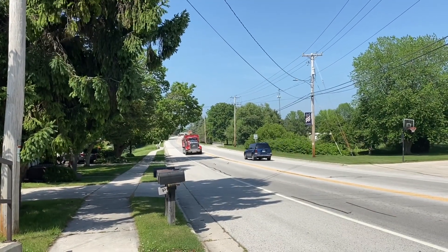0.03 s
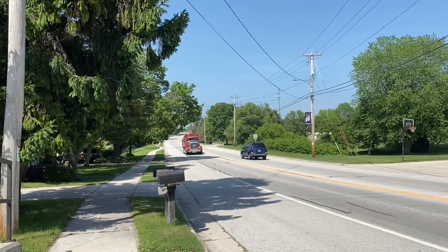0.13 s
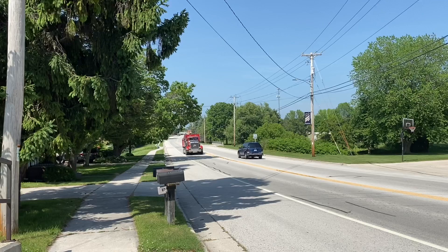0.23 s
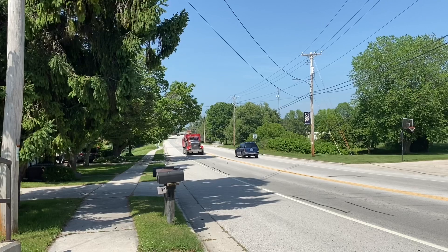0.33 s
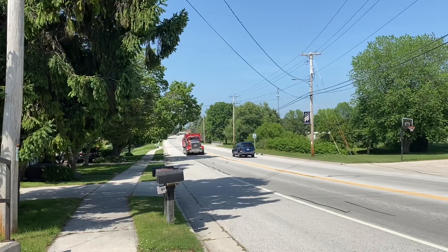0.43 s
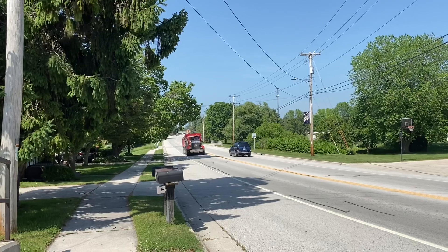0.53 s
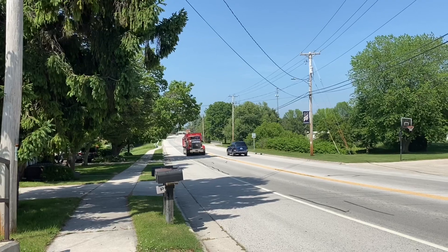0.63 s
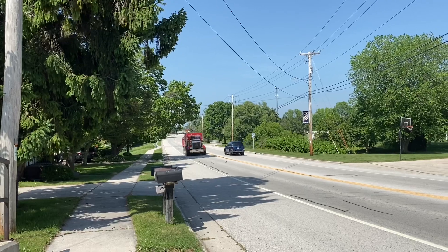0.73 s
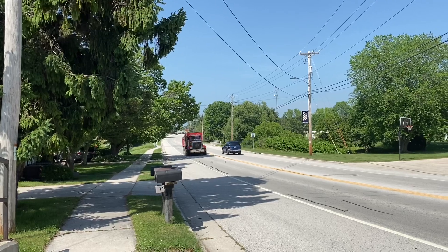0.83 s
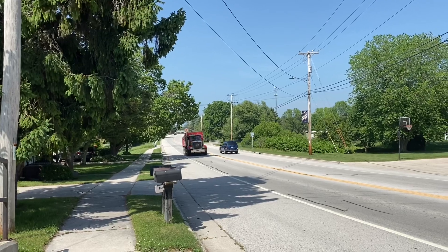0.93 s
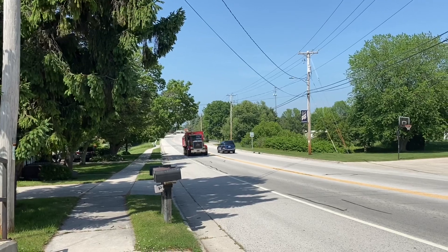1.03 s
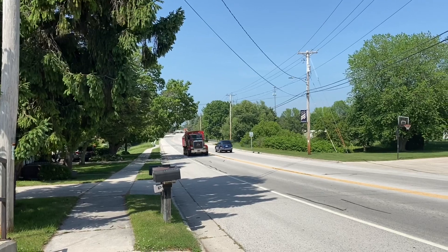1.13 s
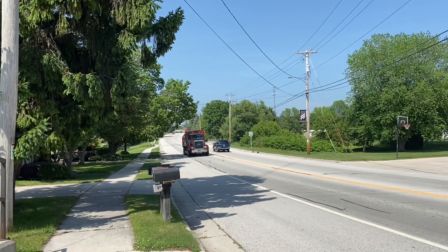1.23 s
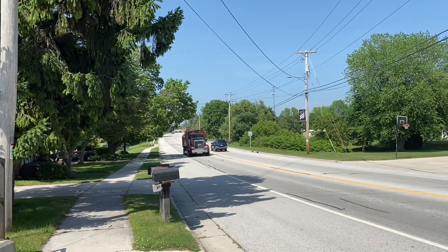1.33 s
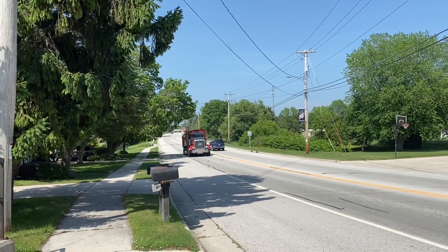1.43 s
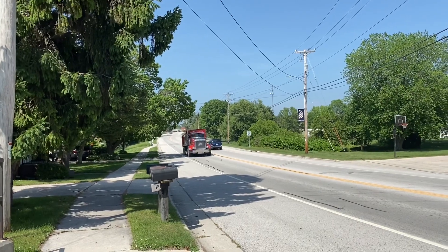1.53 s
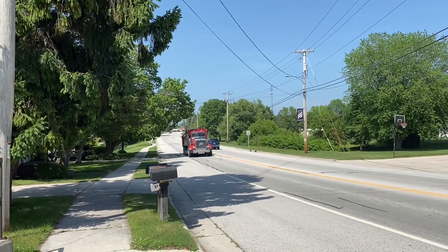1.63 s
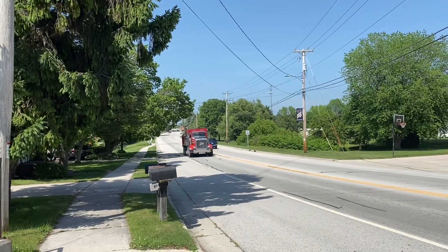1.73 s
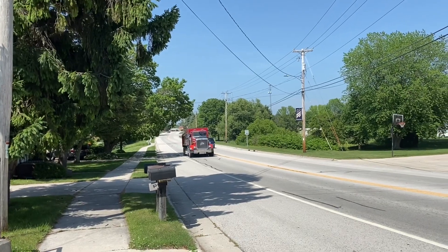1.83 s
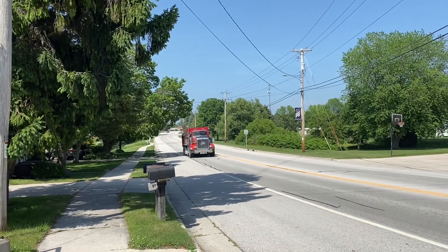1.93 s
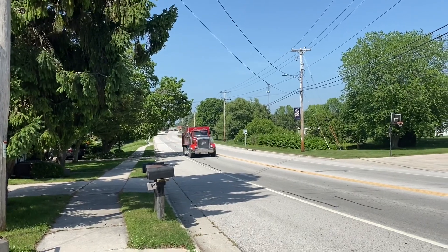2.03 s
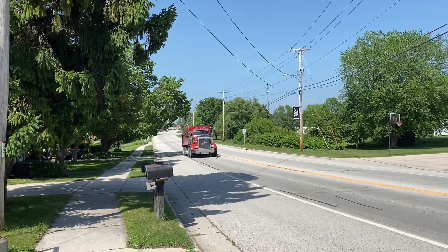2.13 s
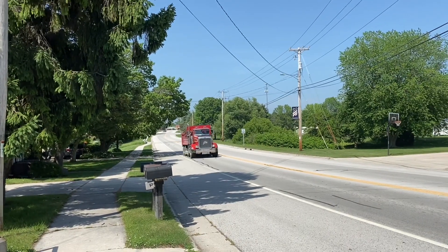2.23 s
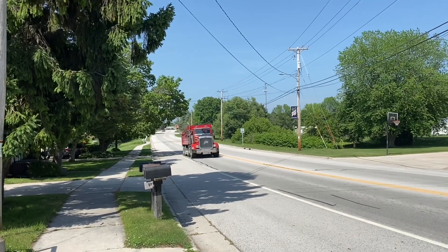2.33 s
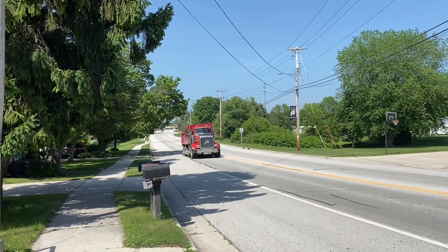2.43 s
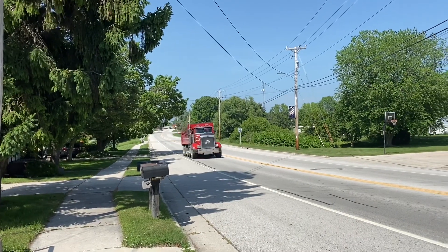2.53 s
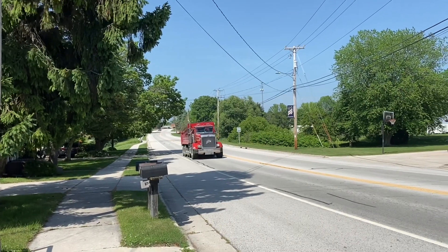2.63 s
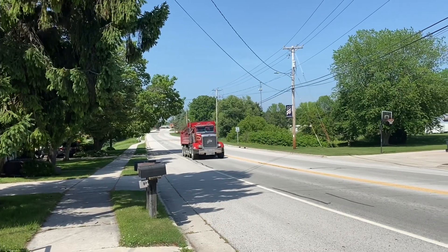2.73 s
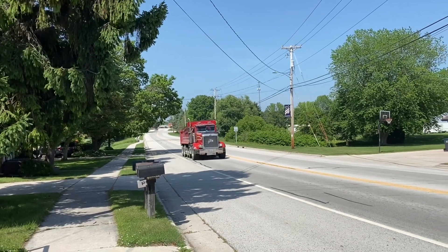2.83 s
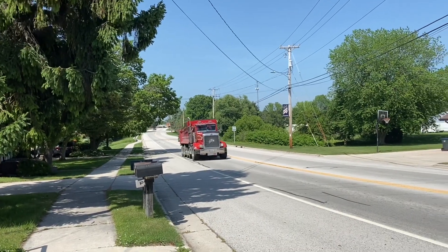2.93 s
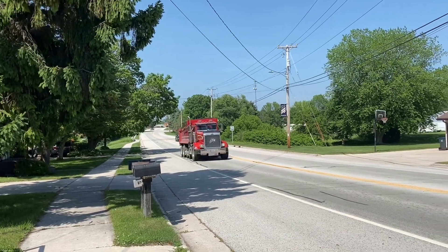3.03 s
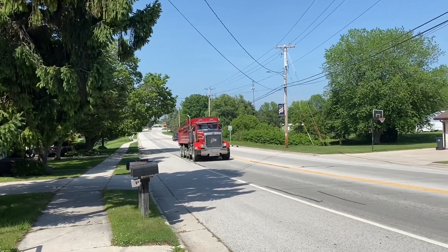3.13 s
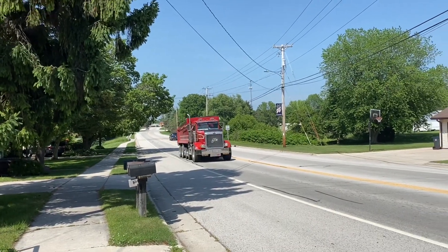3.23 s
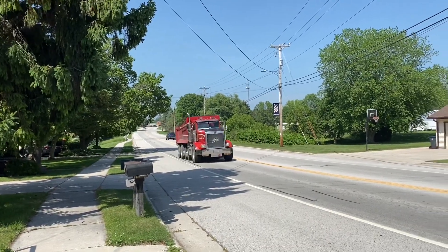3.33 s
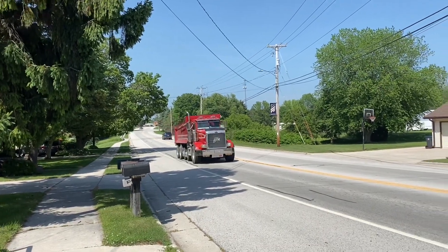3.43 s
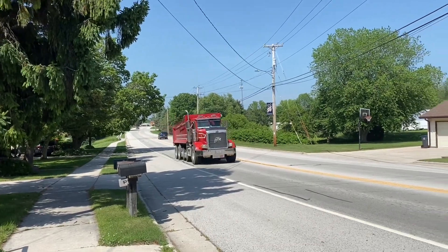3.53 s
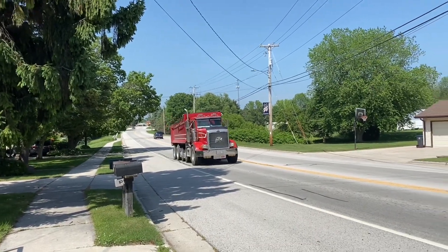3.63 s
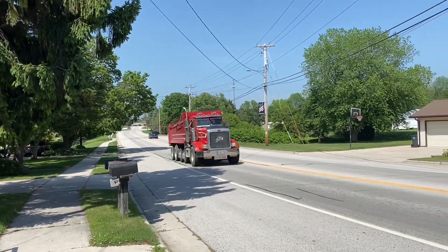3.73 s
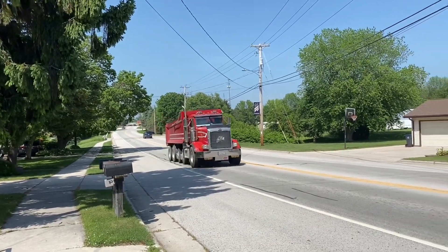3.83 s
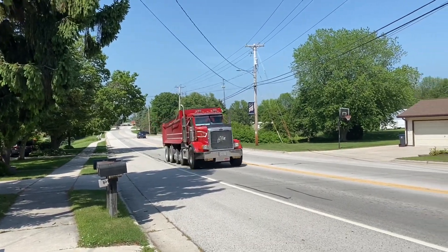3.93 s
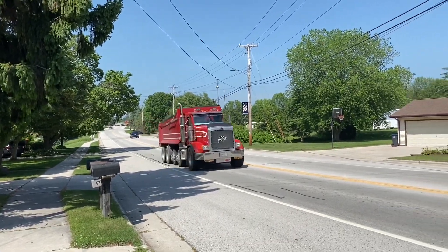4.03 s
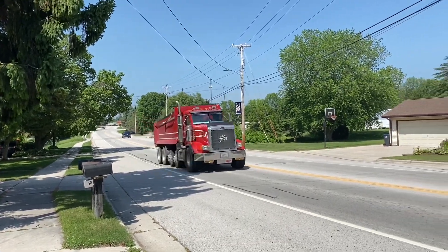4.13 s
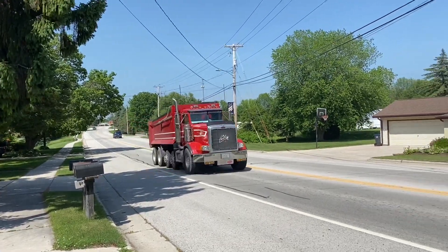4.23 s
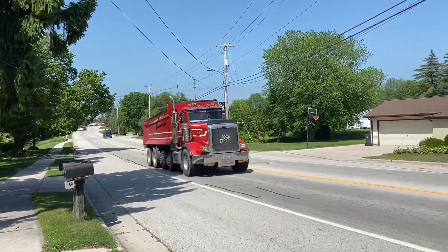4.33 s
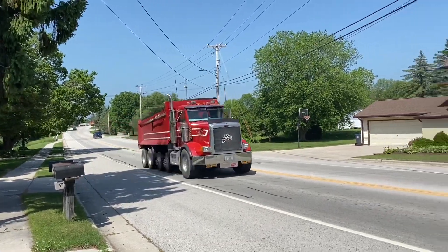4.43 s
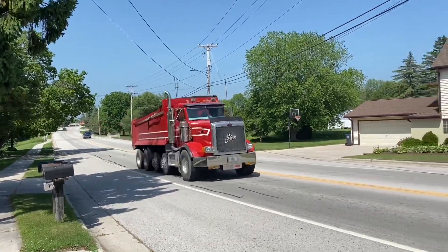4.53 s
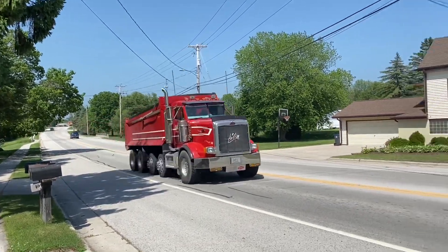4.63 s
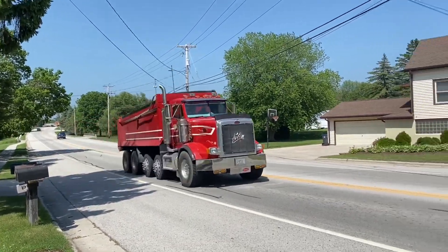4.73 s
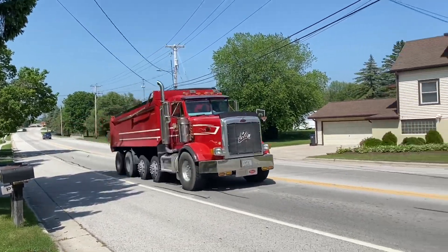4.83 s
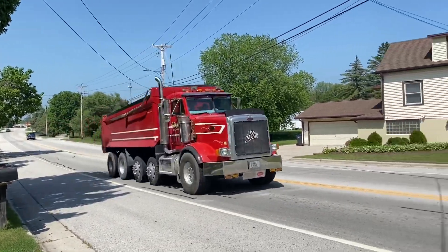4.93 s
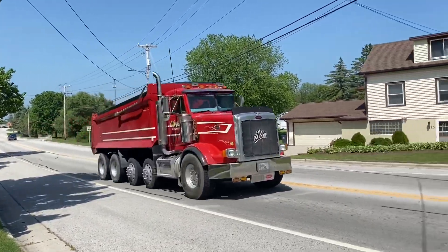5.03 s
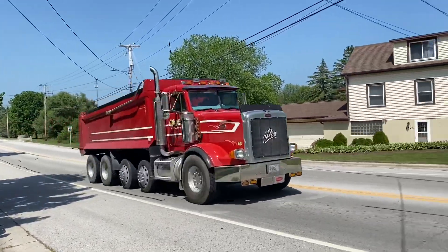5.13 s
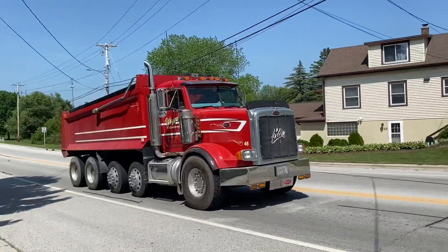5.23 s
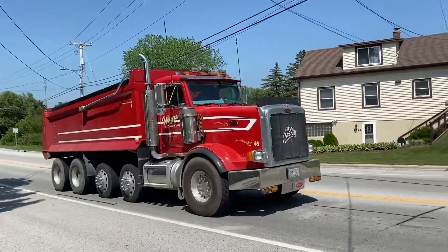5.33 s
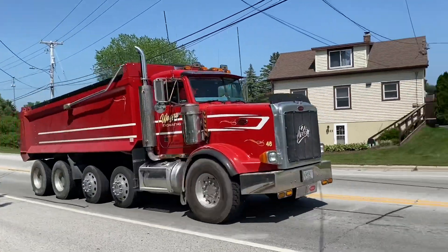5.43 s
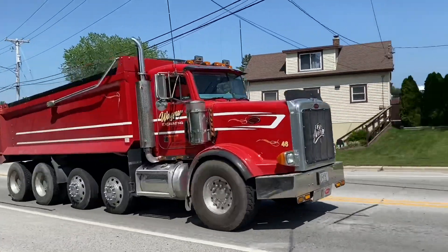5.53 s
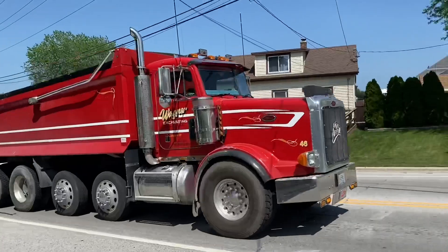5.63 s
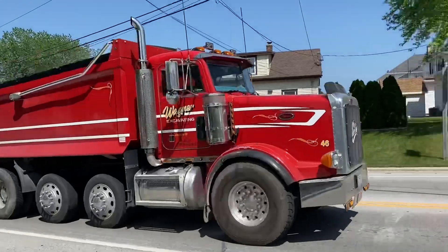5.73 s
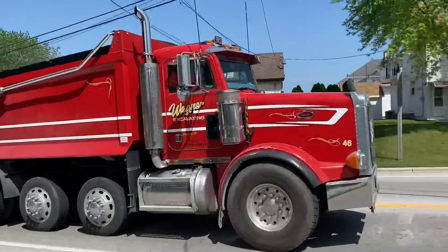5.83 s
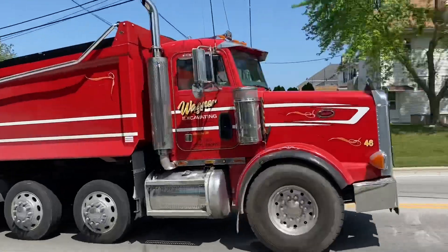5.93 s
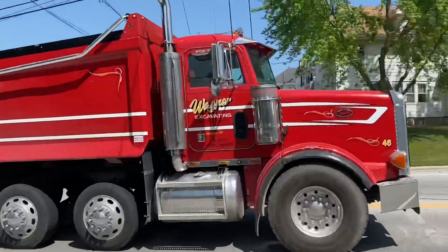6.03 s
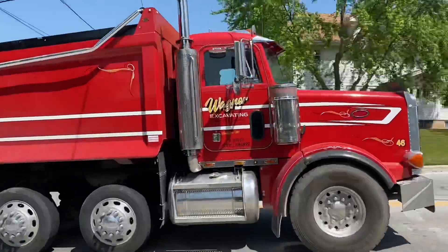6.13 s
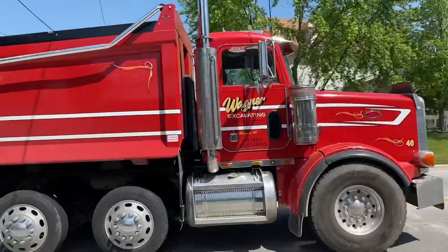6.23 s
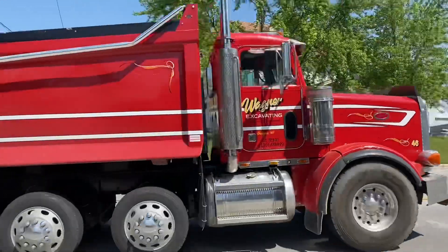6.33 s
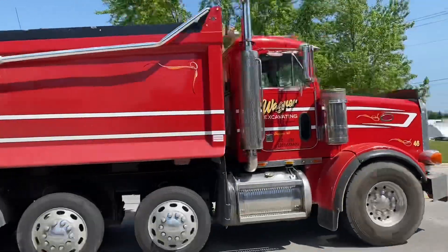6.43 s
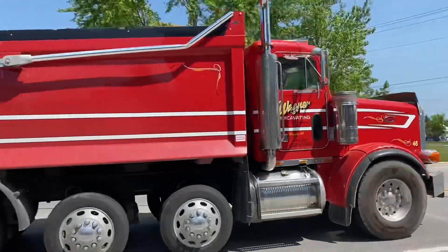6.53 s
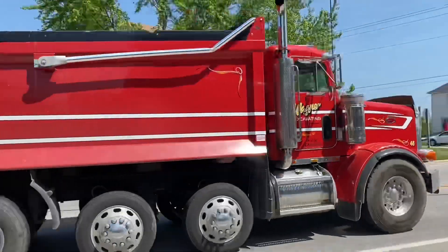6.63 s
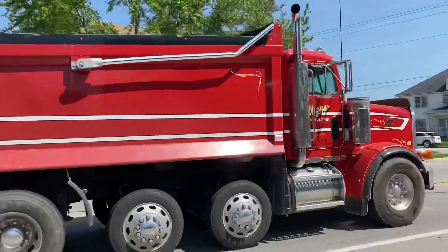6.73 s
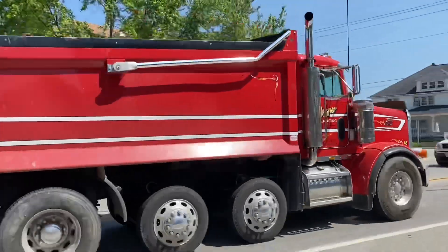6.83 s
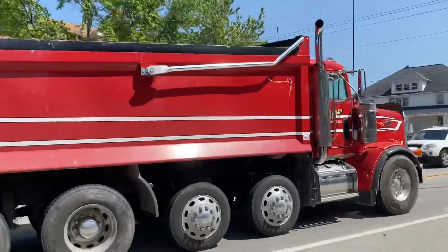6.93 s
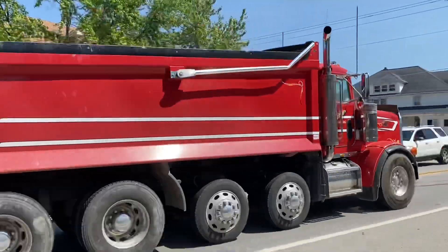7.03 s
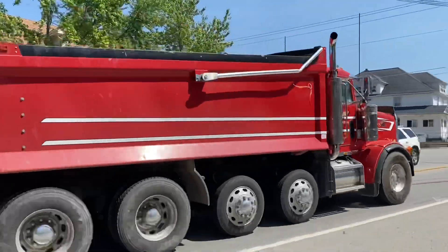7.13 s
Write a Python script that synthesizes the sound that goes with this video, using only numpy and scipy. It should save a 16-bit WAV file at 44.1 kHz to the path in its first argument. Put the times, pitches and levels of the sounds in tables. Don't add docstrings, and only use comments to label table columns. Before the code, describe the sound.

On a tree-lined street, a heavy diesel truck comes closer with its engine brake on, a fast rattling machine-gun boom with cracks and hiss. A bird sings faintly at first while a car drives off. The beat slows and grows very loud, then releases alongside with a chirp, leaving falling turbo whistle, tyre roar, brake squeaks and lumpy low rumble. Stereo roadside microphone, sparse echoes from houses.

```python
import sys
import numpy as np
from scipy import signal
from scipy.fft import rfft, irfft, next_fast_len
from scipy.io import wavfile
from scipy.ndimage import uniform_filter1d, minimum_filter1d

SR = 44100
rng = np.random.default_rng(int(sys.argv[2]) if len(sys.argv) > 2 else 0)


def generate_wav(signal):
    frames = np.transpose(np.atleast_2d(signal))
    scaled = np.clip(frames, -1, 1) * 32767
    pcm = np.round(scaled).astype(np.int16)
    wavfile.write(sys.argv[1], SR, pcm)


def gain_from_decibels(decibels):
    exponent = np.asarray(decibels, float) / 20
    return 10 ** exponent


N = 316638

STEP = 128
TOP_HZ = 12600
RELEASE_S = 6.13
MOUTH_M, STACK_M, WHEELS_M = (0, 3.86), (3.25, 5.65), (-6, 11.9)
STACK_ECHO_MS_M = 30.6

# time in seconds, cylinder ventings a second as heard.
FIRING = [(0.0, 62.05), (0.384, 61.77), (0.769, 61.11), (1.153, 60.69), (1.538, 59.96), (1.922, 59.1),
          (2.306, 58.21), (2.691, 57.36), (3.075, 56.17), (3.459, 55.13), (3.844, 53.44), (4.228, 51.97),
          (4.613, 49.65), (4.997, 47.15), (5.381, 44.47), (5.766, 41.69), (6.15, 38.53)]
# boom level in dB, boom shift in ventings, crack level in dB, knock level in dB.
CYLINDERS = [(1.5, .02, -10, -3), (-2.5, .005, -2.5, -3), (.5, -.024, -3.5, -6), (1.5, .017, -10, -7),
             (-2, .0, 0, 0), (1, -.02, -6, -6)]
# time and length in seconds, pitch in Hz,
# gain in dB.
APPROACH_SWELLS = [(0.24, 0.28, 62, -9), (1.58, 0.61, 298, 6.5), (0.68, 0.66, 10000, -2.5), (1.45, .3, 3600, 5),
                   (1.9, 0.61, 6000, 3.5), (2.43, 0.71, 500, 9), (2.35, 0.34, 1000, 2), (2.77, 0.93, 230, 3.5),
                   (3.16, 0.47, 500, -15), (3.39, 0.51, 1000, 6.5), (3.55, .2, 55, -5), (3.664, 0.29, 272, 6.5),
                   (3.9, 0.47, 160, -5.5), (3.85, 0.11, 214, -9), (4.22, 0.11, 52, -5.5), (4.45, 0.042, 152, -8),
                   (4.7, 0.08, 144, 5), (4.65, .2, 200, 4), (4.84, 0.24, 327, 12), (5.73, 0.22, 168, -6.5),
                   (5, 0.28, 1000, 0), (5.25, 0.36, 138, 10), (5.35, 0.21, 268, 3.5), (6.03, 0.089, 1000, 2),
                   (6, 0.23, 234, -31), (5.55, 0.11, 500, 1.5), (6, 0.13, 500, -4.5), (6, 0.081, 119, -6)]
# time and length in
# seconds, pitch in Hz, gain in dB.
RELEASE_SWELLS = [(6.34, .07, 6460, 9), (6.355, 0.037, 700, 4.5), (6.453, .1, 69, -5), (6.543, .04, 148, 21),
                  (6.623, 0.045, 69, -10), (6.632, 0.059, 100, 3.5), (6.595, 0.092, 5460, -0.5),
                  (6.747, 0.17, 3270, 3.5), (6.8, 0.055, 5170, 2.5), (6.822, 0.059, 100, -3.5),
                  (6.9, 0.057, 138, 13), (6.906, 0.087, 69, 1.5), (7.05, .15, 4600, 2.5), (7.135, 0.091, 131, 22.5),
                  (7.18, 0.076, 100, 3.5)]


def curve(rows):
    s, *columns = np.transpose(rows)
    return [np.interp(np.arange(N) / SR, s, c) for c in columns]


def read(points, hz):
    f, value = np.transpose(points)
    return np.interp(np.log(hz + 30), np.log(f + 30), value)


def slow(x):
    return np.interp(np.arange(N), np.arange(0, N, STEP), x)


def evened(x):
    return x / np.sqrt(np.mean(x ** 2) + 1e-20)


def drift(size):
    once = uniform_filter1d(rng.standard_normal(N), size)
    return evened(uniform_filter1d(once, size))


def resonate(x, hz, width):
    turn = np.exp(2j * np.pi * np.cumsum(hz * np.ones(len(x))) / SR)
    r = np.exp(-np.pi * width / SR)
    smooth = signal.lfilter([(1 - r) ** 2], [1, -2 * r, r * r], x / turn + 1e-18)
    return 2 * (turn * smooth).real


def ring(x, modes):
    t = np.arange(2048) / SR
    shape = np.zeros(len(t))
    for k, (hz, width, db) in enumerate(modes):
        decay = t * width ** 1.5 * np.exp(-np.pi * width * t)
        shape += (-1) ** k * gain_from_decibels(db) * decay * np.sin(2 * np.pi * hz * t)
    return evened(signal.oaconvolve(x, shape)[:N])


def noise(spectrum, patchy_db, size):
    # frequency in Hz, likeness of the noise at the two ports from 0 to 1.
    likeness = [(50, 0.22), (250, 1), (700, 0.82), (2000, 0.4), (5000, 0.46), (9000, 0.47), (13000, 1)]
    frames, hz = 4 * N // size + 5, np.fft.rfftfreq(size, 1 / SR)
    used = hz[hz < min(TOP_HZ, spectrum[-1][0])]
    a, b, c, d, patches = rng.standard_normal((frames, len(used), 5), dtype=np.float32).T
    patches = uniform_filter1d(patches, size=8, axis=0)
    patches = evened(uniform_filter1d(patches, size=8, axis=1))
    unlike = np.sqrt(1 / np.clip(read(likeness, used), .1, 1) - 1)[:, None] * (c + 1j * d) / 2
    colour = gain_from_decibels(read(spectrum, used)[:, None] + patchy_db * patches)
    z = np.zeros((2, len(hz), frames), np.complex64)
    z[:, :len(used)] = np.array([a + 1j * b + unlike, a + 1j * b - unlike]) * colour
    return evened(signal.istft(z, nperseg=size, noverlap=3 * size // 4)[1][:, :N])


def turns():
    return .28 + np.cumsum(curve(FIRING)[0]) / SR


def braking(fade):
    last_turn = 332.4
    return np.clip((last_turn - turns()) / fade + 1, 0, 1)


def since():
    return np.maximum(np.arange(N) / SR - RELEASE_S, 0)


def metres(place):
    m_per_venting, abreast_turn = .2, 321
    return np.hypot(m_per_venting * (abreast_turn - turns()) + place[0], place[1])


def swells(rows, hz):
    t = np.arange(0, N, STEP) / SR
    db = 0
    for s, length, f, gain_db in rows:
        db = db + gain_db * np.exp(-((t - s) / length) ** 2 - (np.log(hz / f) / 0.098) ** 2)
    return db


def level(place, hz, near_db, slope, step_db=0, db_per_s=0):
    far_db = -20 * np.log10(metres(place) / place[1])
    after_db = step_db * (1 - braking(1.3)) + db_per_s * since()
    return near_db + slope * far_db + after_db + slow(swells(APPROACH_SWELLS + RELEASE_SWELLS, hz))


def bounced(x, share):
    late = np.arange(N) - STACK_ECHO_MS_M / metres(STACK_M) * SR / 1000
    return x + share * np.array([np.interp(late, np.arange(N), v) for v in np.atleast_2d(x)])


def street(x):
    taps, t = np.zeros((2, SR // 4)), np.arange(SR // 4) / SR
    at = np.arange(200, SR // 4 - 20, 20) + rng.integers(0, 20, (2, (SR // 4 - 201) // 20))
    np.put_along_axis(taps, at, rng.choice([-1., 1.], at.shape), 1)
    taps *= gain_from_decibels(-60 * t / 0.83)
    return signal.oaconvolve(x[None], taps / np.linalg.norm(taps[0]), axes=1)[:, :N]


def whistle(s, hz, db):
    t = np.arange(s[0], s[-1], 1 / SR)
    sine = np.sin(2 * np.pi * np.cumsum(np.interp(t, s, hz)) / SR)
    tone = np.sqrt(2) * gain_from_decibels(np.interp(t, s, db)) * sine * signal.windows.tukey(len(t), .6)
    return np.pad(tone, (round(s[0] * SR), N))[:N]


def bird():
    # start in seconds, length in seconds, level in dB.
    notes_sung = [
        (0, .25, -59),
        (.28, .38, -62),
        (.78, .26, -53.5),
        (1.08, .17, -64.5),
    ]
    out = np.zeros(N)
    for s, length, db in notes_sung:
        span = np.array([s, s + length])
        out += whistle(span, 5890 - 200 * span, (db, db))
    return out


def driving_away(db):
    return gain_from_decibels(db) * gain_from_decibels(-3.5 * np.arange(N) / SR)


def ground_rumble():
    # frequency in Hz, spectral level in dB per Hz.
    spectrum = [(21, -47), (35, -24), (54, -5), (135, -4), (152, -4), (168, -5), (210, -15), (387, -17.5),
                (500, -18.5), (650, -30.5), (1100, -120)]
    truck = gain_from_decibels(level(WHEELS_M, 100, near_db=-21, slope=0.54, step_db=-3.5, db_per_s=2))
    return np.hypot(truck, driving_away(-47.5)) * noise(spectrum, patchy_db=2.5, size=2048)


def tyre_roar():
    # frequency in Hz, spectral level in dB per Hz.
    spectrum = [(180, -8.5), (300, -3), (367, -11.5), (490, -8), (600, -9.5), (749, -7), (972, -7.5),
                (1110, -13), (1290, -14), (1870, -23.5), (2120, -20.5), (2700, -31), (3000, -29),
                (3900, -54), (6600, -120)]
    truck = gain_from_decibels(level(WHEELS_M, 700, near_db=-21.5, slope=1.12, step_db=-4, db_per_s=1))
    tyres = np.hypot(truck, driving_away(-32.5))
    return bounced(tyres * noise(spectrum, patchy_db=1.5, size=1024), share=.2)


def squeaks():
    # start in seconds, length in seconds, start pitch in Hz, end pitch in Hz, level in dB.
    squeals = [(5.29, .08, 14100, 14100, -43), (5.48, .13, 14150, 14250, -47),
               (5.74, .05, 14000, 14000, -42), (5.92, .1, 13950, 14050, -45),
               (6.132, .018, 5200, 4550, -22), (6.148, .1, 4450, 4150, -32.5),
               (6.21, .07, 13750, 13750, -41), (6.29, .05, 13720, 13720, -53),
               (6.36, .05, 13720, 13720, -52), (6.39, .03, 10950, 10950, -42),
               (6.435, .04, 10750, 10750, -36), (6.43, .07, 13900, 13900, -45),
               (6.5, .07, 14000, 14300, -57), (6.555, .07, 8870, 8870, -28), (6.67, .05, 14700, 14600, -61),
               (4.91, .05, 14200, 14200, -48), (5.45, .04, 15400, 15400, -48),
               (5.72, .03, 15400, 15400, -46), (5.9, .04, 15500, 15500, -46)]
    tones = sum(whistle((s, s + length), (hz, end_hz), (db, db)) for s, length, hz, end_hz, db in squeals)
    return tones * (.5 + .2 * drift(size=60))


def rub():
    hz, width_hz = 3270, 660
    db = -36.5 + slow(swells(RELEASE_SWELLS, hz))
    grain = evened(resonate(rng.standard_normal(N), hz, width_hz))
    return gain_from_decibels(db + 2.3 * drift(size=400)) * grain * (1 - braking(.5))


def idle():
    hz = 155.1 - 25 * since()
    turn = 2 * np.pi * np.cumsum(hz * (1 + .03 * drift(size=900))) / SR
    hum = gain_from_decibels(-44 + slow(swells(RELEASE_SWELLS, hz[::STEP]))) * np.sin(turn)
    octave = gain_from_decibels(-36) * np.sin(2 * turn)
    thud_hz = 69
    thud_db = -29.5 + 8.5 * np.exp(-since() / .1) + slow(swells(RELEASE_SWELLS, thud_hz))
    thuds = gain_from_decibels(thud_db) * ring(rng.standard_normal(N), [(thud_hz, 33, 0)])
    return (np.sqrt(2) * (hum + octave) * gain_from_decibels(1.3 * drift(size=600)) + thuds) * (1 - braking(.5))


def turbo():
    spool_hz = np.where(np.arange(N) < 5.75 * SR, 6400, 7240)
    rest_hz, coast_hz, coast_s = 3350, 7500, 0.785
    coasting_hz = rest_hz + (coast_hz - rest_hz) * np.exp(-since() / coast_s)
    hz = np.where(since() > 0, coasting_hz, spool_hz)
    chop = gain_from_decibels((2.5 + 2.5 * braking(.5)) * drift(size=250) + 1.5 * drift(size=1500))
    narrow = evened(resonate(rng.standard_normal(N), hz, 130))
    broad = evened(resonate(rng.standard_normal(N), hz, 1260))
    share = 0.83 * np.exp(-since() / 0.13)
    db = level(STACK_M, 20000, near_db=-28.5, slope=2, step_db=-10, db_per_s=1.5)
    db = db + slow(swells(RELEASE_SWELLS, hz[::STEP]))
    return gain_from_decibels(db) * chop * (share * broad + (1 - share) * narrow)


def whines():
    # pitch in Hz, width in Hz, level at the nearest in dB.
    bands = [(3540, 150, -36.5), (4805, 200, -38)]
    drive = rng.standard_normal(N) * braking(.5)
    out = np.zeros(N)
    for hz, width, db in bands:
        out += gain_from_decibels(level(STACK_M, hz, near_db=db, slope=1.23)) * evened(resonate(drive, hz, width))
    return out


def exhaust_hiss():
    # frequency in Hz, spectral level in dB per Hz.
    hiss_spectrum = [(1290, 2), (2200, -1), (2660, -4.5), (3230, -0.5), (3740, 3), (4090, 1.5), (4930, -1),
                     (5550, -3.5), (6430, -1), (8090, -20), (9000, -31), (11700, -25), (19800, -120)]
    # frequency in Hz, spectral level in dB per Hz.
    air_spectrum = [(4470, -37), (7600, 0.5), (8260, -1.5), (8790, -4.5), (9640, -5.5), (10300, -6.5),
                    (11800, -8.5), (12500, 0.5), (16200, -31), (22000, -120)]
    hiss_db = level(STACK_M, 5700, near_db=-23.5, slope=0.997, step_db=-5, db_per_s=-5)
    air_db = level(STACK_M, 10000, near_db=-27.5, slope=1.21, step_db=-14, db_per_s=-4)
    depth = (0.083 + 0.16 * MOUTH_M[1] / metres(MOUTH_M)) * braking(0.56)
    throb = 1 + depth * np.cos(2 * np.pi * (turns() - .15))
    flicker = gain_from_decibels(0.58 * drift(size=300))
    jet = gain_from_decibels(hiss_db) * noise(hiss_spectrum, patchy_db=1.57, size=512)
    jet = jet + gain_from_decibels(air_db) * noise(air_spectrum, patchy_db=2.0, size=512)
    return flicker * throb * jet


def cracks():
    # mode in Hz, width in Hz, level in dB.
    crack_modes = [(750, 120, -2), (1005, 270, 0), (1270, 300, -4), (1540, 260, -11), (2080, 300, -21)]
    # mode in Hz, width in Hz, level in dB.
    knock_modes = [(362, 120, -2.5), (499.6, 92, 4), (665, 170, -2)]
    u = turns() + .11
    each = u.astype(int)
    luck = rng.standard_normal((each[-1] + 1, 2))[each]
    click = np.diff(each, prepend=each[0])
    puff_size = .012 + .002 * STACK_ECHO_MS_M / metres(STACK_M)
    puff = puff_size * rng.standard_normal(N) * np.exp(-(u % 1) / .5)
    unequal = np.tanh(metres(STACK_M) / 4.2 / 2)
    crack_db = level(WHEELS_M, 1000, near_db=-26.5, slope=1.76, step_db=3)
    knock_db = level(STACK_M, 500, near_db=-20.5, slope=1.37, step_db=5)
    out = np.zeros(N)
    for column, modes, db in ((2, crack_modes, crack_db), (3, knock_modes, knock_db)):
        cylinder_db = np.transpose(CYLINDERS)[column, each % 6] * unequal
        size = gain_from_decibels(cylinder_db + 1.1 * luck[:, column - 2])
        out += gain_from_decibels(db) * ring((click + puff) * size * braking(.1), modes)
    return bounced(out, share=.7)[0] * .82


def order_db(k):
    # frequency in Hz, level in dB.
    pipe = [(40, -20.5), (52, -12), (100, -28), (150, -20), (200, -17.5), (270, -21.5), (320, -28.5),
            (430, -42)]
    hz, far = k * curve(FIRING)[0][::STEP], metres(MOUTH_M)[::STEP]
    echo_s = 20.83 / far / 1000
    echo = 1 + 1.04 * np.tanh(hz / 265) * np.exp(2j * np.pi * hz * echo_s)
    slope = 0.41 + 6 * np.maximum(np.log(hz / 283), 0)
    path = (abs(echo) + 0.012) * (MOUTH_M[1] / far) ** slope
    return slow(read(pipe, hz) + 20 * np.log10(path) + swells(APPROACH_SWELLS, hz))


def boom():
    slowed = np.maximum(56.5 - curve(FIRING)[0], 0)
    u = turns() - .5 + .017 * slowed
    spread = .07 * np.tanh(slowed / 8)
    each = np.arange(-1, int(u[-1]) + 3)
    luck = rng.standard_normal((len(each), 2))
    db, shift = np.transpose(CYLINDERS)[:2, each % 6]
    size = gain_from_decibels(np.interp(u, each, db + .9 * luck[:, 0]))
    uneven = u - np.interp(u, each, shift + .005 * luck[:, 1])
    upper = np.zeros(N)
    for k in range(2, 8):
        upper += gain_from_decibels(order_db(k)) * np.cos(2 * np.pi * (k * uneven + spread * k * k))
    lowest = gain_from_decibels(order_db(1) + 0.44 * drift(size=500)) * np.cos(2 * np.pi * (u + spread))
    return np.sqrt(2) * (lowest * braking(3.9) + size * upper * braking(0.26))


def scene():
    # frequency in Hz, phase lead of the left in radians.
    port_phase = [(0, 0), (1030, 1.0), (2070, -0.2), (3790, 2.6), (4650, 5.1), (6370, 4.8), (7840, 9.4),
                  (8790, 9.0), (10400, 6.4), (11600, 6.2), (12600, 3.3), (14600, 3.0), (14800, 0.0),
                  (15700, -0.0)]
    # frequency in Hz, left over right in dB.
    port_db = [(60, -1.0), (110, -1.5), (200, -1.0), (380, 0.5), (700, 1.5), (1290, 3.5), (2380, 0.0),
               (4400, -2.0), (8120, 0.5), (15000, 0.0)]
    # frequency in Hz, level of the street echoes in dB.
    echo_db = [(50, -22), (250, -18), (700, -13), (2000, -10), (5000, -10), (9000, -12), (13000, -14)]
    # frequency in Hz, width in Hz, gain in dB.
    dips = [(3300, 220, -3), (5500, 150, -3), (8480, 540, -1.5)]
    # time in seconds, left over right in dB.
    pan_track = [(0, -1), (2.5, -1.3), (4.5, -1), (5.5, -.2), (6.2, .4), (6.7, .8), (7.18, 0)]
    truck = boom() + cracks() + turbo() + rub() + whines() + idle() + bird()
    road = ground_rumble() + tyre_roar() + exhaust_hiss()
    size = next_fast_len(N)
    hz, side = np.fft.rfftfreq(size, 1 / SR), np.array([[.5], [-.5]])
    ports = gain_from_decibels(side * read(port_db, hz)) * np.exp(1j * side * read(port_phase, hz))
    wide = rfft(truck + road, size) + gain_from_decibels(read(echo_db, hz)) * rfft(street(truck), size)
    housing = gain_from_decibels(sum(db * np.exp(-((hz - f) / width) ** 2) for f, width, db in dips))
    both = ports * housing * wide * (hz < TOP_HZ) + rfft(squeaks(), size)
    pan = curve(pan_track)[0]
    return irfft(both, size)[:, :N] * gain_from_decibels(side * (pan - pan.mean()))


def roll_off(x):
    return signal.sosfilt(signal.butter(12, 16110, fs=SR, output="sos"), x)


def record(dry):
    room = np.minimum(.93 / (abs(dry).max(0) + 1e-9), 1)
    room = minimum_filter1d(room, size=400)
    return roll_off(dry * uniform_filter1d(room, size=400))


dry = scene()
out = record(dry)
generate_wav(out)
```